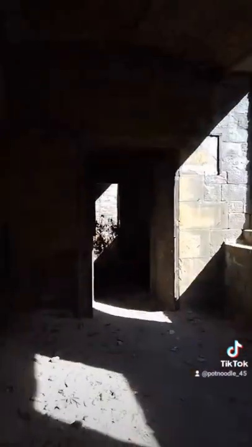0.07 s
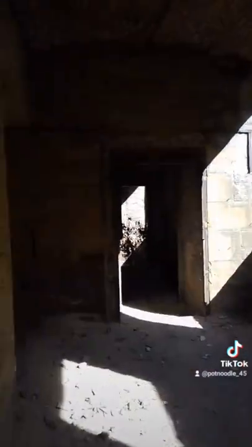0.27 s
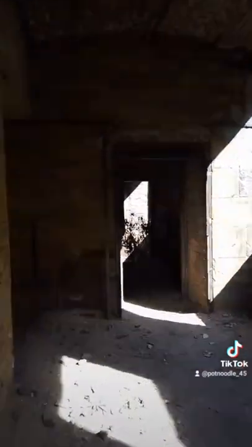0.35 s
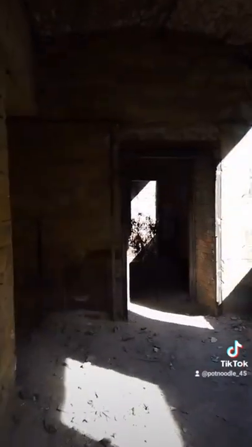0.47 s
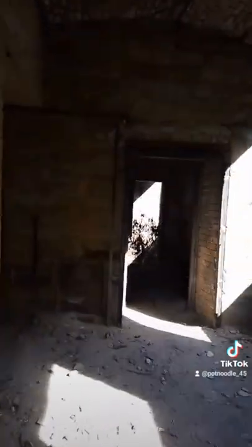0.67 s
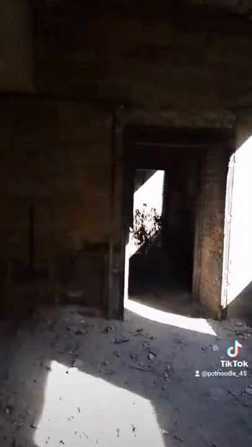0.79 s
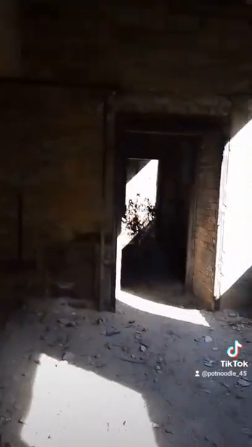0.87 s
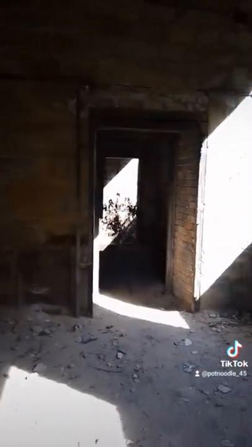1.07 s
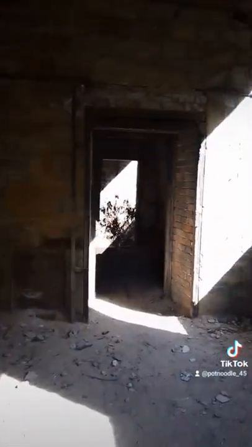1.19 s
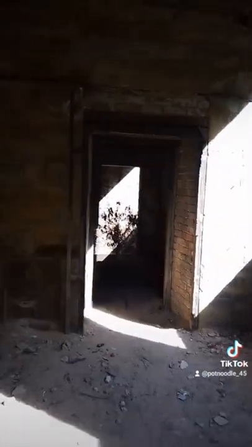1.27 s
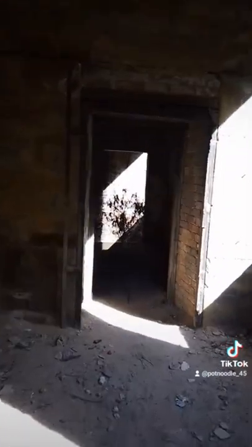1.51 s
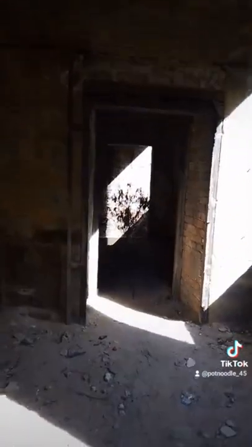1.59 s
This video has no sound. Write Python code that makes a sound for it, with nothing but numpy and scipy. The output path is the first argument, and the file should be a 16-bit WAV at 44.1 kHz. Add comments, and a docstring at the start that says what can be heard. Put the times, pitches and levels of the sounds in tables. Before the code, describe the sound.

A small hard shard clinks on a stone floor in an echoing, empty building. It first jingles under a shoe, and the heel thuds softly at 0.1 seconds. Kicked at about 0.2 seconds, it tumbles with a loud glassy ring, its bounces fading by 0.6. Quiet scuffs and gritty crunches follow from 0.7 to 1.6 seconds, with very faint birds outside over a low, steady room tone.

```python
"""Kicked shard in a stone hall

Someone walks over grit in a large, empty stone building. A small hard shard jingles under the shoe,
the heel lands, and the toe sends the shard tumbling with a high glassy ring until it knocks to rest
in quick, fading bounces. The next step scuffs and crunches, and the bare walls answer.
Birds chirp faintly outside, over a steady bed of air."""
import sys
import numpy as np
from scipy import signal
from scipy.fft import rfft, irfft, next_fast_len
from scipy.io import wavfile

SR = 44100
rng = np.random.default_rng(int(sys.argv[2]) if len(sys.argv) > 2 else 0)


def wav_out(sig):
    """Save sig, one row per channel (or a flat mono array), as 16-bit PCM at SR to the path in sys.argv[1]."""
    wavfile.write(sys.argv[1], SR, np.round(np.clip(np.atleast_2d(sig).T, -1, 1) * 32767).astype(np.int16))


N = 72765
T = np.arange(N) / SR

# The shard hits the floor. Each row: start in seconds, low ring in dB, high ring in dB,
# ring t60 in seconds, tick in dB, knock in dB.
CONTACTS = [(0.2250, -24, -22, 0.17, -17.5, -19.5), (0.2268, -5.5, -30, 0.62, -41, -39),
            (0.2405, -17.5, -28, 0.071, -14, -30), (0.2408, -1.5, -23, 0.12, -30, -26),
            (0.2448, -15.5, -15, 0.088, -3.5, -32), (0.2535, -15, -19, 0.39, -20, -17),
            (0.2974, -10, -19.5, 0.3, -11, -16.5), (0.3181, -1.5, -28, 0.085, -18, -13.5),
            (0.3280, -18, -27, 0.1, -34, -34), (0.3595, -19.5, -33, 0.064, -30, -65),
            (0.3986, -26.5, -32, 0.22, -19, -6.5), (0.4402, -24.5, -32, 0.087, -37, -17.5),
            (0.4536, -30, -36, .2, -23, -26), (0.4691, -35.5, -38.5, 0.21, -45, -22),
            (0.4897, -30, -44, 0.1, -63, -21), (0.5078, -28, -41.5, 0.14, -59, -25.5),
            (0.5238, -28, -50, 0.25, -52, -29), (0.5370, -34, -45, 0.24, -56, -30.5),
            (0.5487, -28.5, -67, 0.091, -60, -39), (0.5725, -34, -58, 0.099, -60, -60)]
# Its glassy modes. Each row: pitch in Hz, level in dB, share of the ring t60, 0 for low or 1 for high.
SHARD_MODES = [(9236, -1.5, 0.64, 0), (9220, -28, 0.51, 0), (9341, -23, 0.88, 0), (11638, -0.5, 1.0, 1)]
# The body of a knock. Each row: pitch in Hz before any drop or sag, level in dB.
KNOCK_PARTIALS = [(4367, 1), (5200, -6), (3400, -22)]
# The shard skids. Each row: start in seconds, length in seconds, opening level in dB.
SKIDS = [(0.238, 0.11, -24), (0.317, .075, -26.5)]
# Pinches under the sole. Each row: start in seconds, ring in dB, pitch in Hz, tick in dB.
JINGLES = [(0.01, -22, 9610, -18.5), (0.0401, -23.5, 9600, -27), (0.0500, -28.5, 9220, -23),
           (0.0595, -34, 10130, -28), (0.0916, -22, 9510, -21), (0.0990, -31, 9320, -39),
           (0.1225, -37, 9400, -33)]
# The pinched shard rings on. Each row: start in seconds, pitch in Hz, level in dB, t60 in seconds.
AFTER_RINGS = [(0.092, 11638, -40, .15)]
# Single grains crack. Each row: start in seconds, level in dB.
CRACKS = [(0.7078, -29.5), (0.7290, -24.5), (0.8048, -26), (0.8166, -21), (0.86, -31), (1.1640, -41),
          (1.35, -39), (1.3700, -29.5), (1.548, -37), (1.5630, -36)]
# The sole grinds on grit. Each row: start in seconds, length in seconds, peak level in dB.
CRUNCHES = [(0.005, 0.032, -43), (0.03, .05, -45.5), (0.087, 0.051, -36.5), (0.684, 0.078, -46),
            (0.729, 0.1, -47), (0.787, 0.22, -51), (1.11, 0.59, -56), (1.54, 0.088, -54)]
# The fader curve of the sliding sole. Each row: time in seconds, level in dB.
RUB_LEVEL = [(0.56, -65), (0.64, -56), (0.72, -51.5), (0.785, -49), (0.85, -50.5), (0.94, -55), (0.98, -87),
             (1.12, -67.5), (1.17, -51.5), (1.25, -64.5), (1.38, -56.5), (1.48, -65)]
# Heel and sole land. Each row: start in seconds, level in dB, t60 in seconds, low-pass edge in Hz.
THUDS = [(0.1005, -29.5, 0.026, 1700), (0.114, -37.5, 0.23, 1240), (0.141, -38, 0.37, 656),
         (1.162, -70, 0.045, 1900)]
# The stone floor's modes. Each row: pitch in Hz, level in dB, t60 in seconds.
SLAB_MODES = [(1061, -49, 0.69), (1534, -36, 0.05), (4160, -27.5, 0.1)]
# The floor booms. Each row: start in seconds, pitch in Hz, level in dB, t60 in seconds.
BOOMS = [(0.10, 63.4, -59.5, 0.84), (0.227, 178, -57, 0.26), (0.691, 169.7, -47, 0.37),
         (1.011, 264.6, -55.5, 1.05)]
# Bird calls. Each row: start in seconds, length in seconds, first and last pitch in Hz, level in dB.
CHIRPS = [(0.164, .05, 7130, 6780, -51), (0.929, .11, 5730, 5030, -58), (1.01, 0.052, 4870, 4130, -57.5),
          (1.061, 0.038, 2610, 2615, -63), (1.109, 0.055, 7900, 7190, -51.5),
          (1.364, 0.057, 5420, 5300, -59), (1.425, 0.043, 2655, 2580, -61)]

# The EQ curves that colour each layer. Each row: frequency in Hz, gain in dB.
TICK_EQ = [(30, -49), (150, -22.5), (600, -32), (1000, -8.5), (1900, -12), (3000, -13), (4200, 6),
           (5400, -5), (6600, 5.5), (7700, -9), (9500, 7.5), (11500, 4.5), (13000, -30), (16000, -30)]  # bright snap of shard on stone
SKID_EQ = [(1500, -34), (2500, -24), (4000, -9.5), (5000, -14), (6600, -14), (7800, -16), (8800, -13),
           (9230, 7.5), (9600, -3), (10700, -18.5), (11400, -27), (11640, 9), (12000, -17.5), (14000, -43)]  # chatter that peaks at the shard's modes
PINCH_EQ = [(100, -31), (3000, -47), (4200, -16), (5000, -3), (6400, -2), (8000, -6), (9600, -8),
            (11000, -22), (12200, -7), (14000, -20), (16000, -32)]  # thin ticks under the sole
CRACK_EQ = [(800, -11.5), (2500, -27), (4000, -18), (6500, -16), (8300, -5.5), (9300, 7), (10100, 8),
            (11000, -10), (13000, -20), (16000, -22)]  # brittle splitting grains
CRUSH_EQ = [(1200, -18), (2100, -3.5), (3200, -1.5), (5000, -13), (7000, 6.5), (9000, -15), (14000, -33)]  # crumbling mortar
GRIT_EQ = [(800, -21.5), (2500, -16), (4000, 4), (5400, 0.5), (6500, -4), (8300, -3), (9300, 6.5),
           (10100, 5.5), (11000, -1.5), (13000, -7.5), (16000, -29)]  # sandy crunch
RUB_EQ = [(500, -19), (900, -18), (1170, -15.5), (1300, -13), (1395, -1), (1520, -10), (1800, -12.5),
          (2300, -25.5), (2800, -21), (3300, -42), (5400, -21), (7000, -37)]  # hollow scuff
THUD_EQ = [(60, -29.5), (170, -6), (300, -7.5), (410, 3.5), (520, 2.5), (680, -9.5), (1100, -3), (1500, -2),
           (2200, -12)]  # dull weight of the shoe
KICK_EQ = [(40, -27), (200, -4), (600, -3), (1000, 9), (1600, -2.5), (2700, 6), (5500, 2), (8000, -13),
           (14000, -27)]  # midrange tap of the toe
HALL_EQ = [(100, -6), (180, 7.5), (500, -11.5), (1050, 1.5), (2200, -9.5), (4100, -9.5), (5400, -7),
           (7000, -12.5), (9300, 1), (12000, -15.5), (16000, -4.5)]  # bare stone walls
AIR_EQ = [(25, -37), (50, -10), (64, -5), (85, -5), (120, -2.5), (190, 0), (270, -4.5), (400, -6.5),
          (600, -8.5), (1040, -6), (1700, -15), (2200, -13.5), (2900, -20.5), (4000, -12.5), (5400, -20),
          (6600, -15.5), (8000, -14.5), (9900, -7.5), (11300, -14), (14800, -26.5), (16000, -37)]  # low murmur with a fine hiss on top

TICK_T60_S = 0.0053


def shard_ring():
    """The glassy ring: each contact chokes the shard's modes and strikes them anew."""
    choke_s = 0.0021
    out = np.zeros(N)
    ends = [row[0] for row in CONTACTS[1:]] + [N / SR]
    for (start, low_db, high_db, t60, _, _), end in zip(CONTACTS, ends):
        choke = np.exp(-np.clip((T - end) / choke_s, 0, 20))
        for hz, db, share, is_high in SHARD_MODES:
            strike_db = high_db if is_high else low_db
            out += from_db(db + strike_db) * choke * ring(start, hz, t60 * share)
    return out


def shard_blows():
    """Each hit on stone gives a sharp tick and a blunt knock that sags in pitch."""
    peak_s, sag_hz_per_s, hz_per_db = 0.00044, 74000, 11
    ticks, knocks = np.zeros(N), np.zeros(N)
    for start, _, _, _, tick_db, knock_db in CONTACTS:
        ticks += from_db(tick_db) * burst(start, TICK_T60_S)
        age = np.clip(T - start, 0, 20 * peak_s)
        swell = (age / peak_s * np.exp(1 - age / peak_s)) ** 2
        for hz, db in KNOCK_PARTIALS:
            onset_hz = hz + hz_per_db * knock_db  # softer blows are duller
            cycles = age * (onset_hz - .5 * sag_hz_per_s * age)
            knocks += from_db(knock_db + db) * swell * np.sin(2 * np.pi * cycles)
    return colour(ticks, TICK_EQ) + butter(knocks, 3, [2580, 5580], "band")


def shard_skids():
    """The shard's edge chatters over the floor in short, fading slides."""
    fade_db = 14
    level = np.zeros(N)
    for start, length, db in SKIDS:
        along = np.clip((T - start) / length, 0, 1)
        level += from_db(db - fade_db * along) * (T > start) * (T < start + length)
    return grains(level, SKID_EQ)


def jingles():
    """Pinched under the sole, the shard ticks and rings briefly."""
    rings = sum(from_db(db) * ring(start, hz, t60=0.037) for start, db, hz, _ in JINGLES)
    rings += sum(from_db(db) * ring(start, hz, t60) for start, hz, db, t60 in AFTER_RINGS)
    ticks = sum(from_db(db) * burst(start, TICK_T60_S) for start, _, _, db in JINGLES)
    return rings + colour(ticks, PINCH_EQ)


def grit():
    """Under the walker's weight grains crack, a lump of mortar crumbles and grit crunches."""
    attack_share = 0.19
    cracks = sum(from_db(db) * burst(start, t60=0.0094) for start, db in CRACKS)
    mortar = from_db(-40.5) * decay(start=0.049, t60=0.11) * noise(CRUSH_EQ)
    pressure = np.zeros(N)
    for start, length, db in CRUNCHES:
        corners = [start, start + attack_share * length, start + length]
        pressure += from_db(db) * np.interp(T, corners, [0, 1, 0])
    return colour(cracks, CRACK_EQ) + mortar + grains(pressure, GRIT_EQ)


def sole_rub():
    """The sliding sole rubs hollowly; a narrow squeak comes forward as it presses harder."""
    squeak_hz, half_width_hz = 1383, 60
    band_hz = [squeak_hz - half_width_hz, squeak_hz + half_width_hz]
    squeak = from_db(-7.5) * rms_one(butter(rng.standard_normal(N), 2, band_hz, "band"))
    effort = from_db(np.interp(T, *np.transpose(RUB_LEVEL)))
    return effort * (noise(RUB_EQ) + squeak * np.sqrt(effort / effort.max()))


def shoe_thuds():
    """Dull thuds as the foot rolls down from heel to sole."""
    out = np.zeros(N)
    for start, db, t60, edge_hz in THUDS:
        dull = butter(noise(THUD_EQ), 4, edge_hz)
        out += from_db(db) * decay(start, t60) * rms_one(dull)
    return out


def toe_kick():
    """One tight tap as the toe meets the shard."""
    return from_db(-21) * colour(burst(start=0.2248, t60=.006), KICK_EQ)


def slab_ring():
    """The stone floor rings faintly under each knock."""
    blows = np.zeros(N)
    for start, *_, knock_db in CONTACTS:
        blows[int(start * SR)] = from_db(knock_db)
    response = sum(from_db(db) * ring(0, hz, t60) for hz, db, t60 in SLAB_MODES)
    return signal.fftconvolve(blows, response)[:N]


def floor_booms():
    """The walker's weight draws soft, low booms from the floor."""
    return sum(from_db(db) * ring(start, hz, t60) * attack(start, rise_s=0.018)
               for start, hz, db, t60 in BOOMS)


def hall(send):
    """Quick scatter from the floor, then a long diffuse tail whose treble dies first."""
    split_hz, tail_db, early_db = 6500, -7.5, -4
    white = rng.standard_normal((3, N))
    body = butter(white[0], 4, split_hz) * decay(0, t60=0.89)
    treble = butter(white[1], 4, split_hz, "high") * decay(0, t60=0.3)
    tail = (body + treble) * attack(0, rise_s=0.016)
    early = white[2] * decay(start=.003, t60=0.15)
    response = (from_db(tail_db) * rms_one(tail) + from_db(early_db) * rms_one(early)) / np.sqrt(N)
    return signal.fftconvolve(send, colour(response, HALL_EQ))[:N]


def birds():
    """Trilled, mostly falling chirps from outside, washed out by the walls."""
    trill_hz, trill_depth = 65.7, 0.045
    trill = 1 + trill_depth * np.sin(2 * np.pi * trill_hz * T)
    calls = np.zeros(N)
    for start, length, first_hz, last_hz, db in CHIRPS:
        along = np.clip((T - start) / length, 0, 1)
        hz = (first_hz + (last_hz - first_hz) * along) * trill
        swell = np.sqrt(2 * np.abs(np.sin(np.pi * along)))
        calls += from_db(db) * swell * np.sin(2 * np.pi * np.cumsum(hz) / SR)
    wash = rms_one(rng.standard_normal(N) * decay(0, t60=0.65)) / np.sqrt(N)
    return signal.fftconvolve(calls, wash)[:N]


def air():
    """The quiet, steady room tone of the empty building."""
    return from_db(-55) * noise(AIR_EQ)


def ring(start, hz, t60):
    """One struck mode, a little detuned at random."""
    age = np.maximum(T - start, 0)
    detuned_hz = hz + 5.15 * rng.normal()
    return decay(start, t60) * attack(start, rise_s=0.00051) * np.sin(2 * np.pi * detuned_hz * age)


def burst(start, t60):
    """A hard contact: one sharp click and a brief rough tail."""
    tail_share = 0.81  # of the energy
    fade = decay(start, t60)
    out = np.sqrt(tail_share) * fade * rng.choice([-1, 1], N)
    out[int(start * SR)] += np.sqrt((1 - tail_share) * np.sum(fade ** 2))
    return out


def grains(level, eq):
    """Dense tiny clicks of uneven size, riding a level curve through a gain-matched EQ."""
    grains_per_s, spread_db = 1200, 2
    sizes = from_db(spread_db * np.minimum(rng.exponential(1, N), 4))
    signs = rng.choice([-1, 1], N)
    clicks = rms_one(sizes * signs * (rng.random(N) < grains_per_s / SR))
    eq_gain = np.std(colour(rng.standard_normal(N), eq))
    return colour(level * clicks, eq) / eq_gain


def noise(eq):
    """Coloured noise at rms 1."""
    return rms_one(colour(rng.standard_normal(N), eq))


def attack(start, rise_s):
    """A fade-in with time constant rise_s."""
    return 1 - np.exp(-np.maximum(T - start, 0) / rise_s)


def decay(start, t60):
    """An envelope that opens at start and falls 60 dB every t60 seconds."""
    return (T >= start) * from_db(-60 * np.clip((T - start) / t60, 0, 4))


def colour(x, eq):
    """Minimum-phase EQ: nothing rings ahead of a transient."""
    size = 2 * next_fast_len(N)
    hz, db = np.transpose(eq)
    bin_hz = np.arange(size // 2 + 1) * SR / size
    gain = from_db(np.interp(np.log(bin_hz + 1), np.log(hz), db))
    cepstrum = irfft(np.log(gain))
    cepstrum[1:size // 2] *= 2  # fold onto positive time to make the filter causal
    cepstrum[size // 2 + 1:] = 0
    return irfft(rfft(x, size) * np.exp(rfft(cepstrum)))[:N]


def butter(x, order, hz, kind="low"):
    """A smooth low-, high- or band-pass."""
    return signal.sosfilt(signal.butter(order, hz, kind, fs=SR, output="sos"), x)


def from_db(db):
    """Decibels to gain."""
    return 10 ** (np.asarray(db) / 20)


def rms_one(x):
    """Scale to rms 1."""
    return x / np.sqrt(np.mean(x ** 2) + 1e-20)


def scene():
    """The mono mix: shard and footsteps feed the hall, over floor resonances, birds and air."""
    rings, skids, blows = shard_ring(), shard_skids(), shard_blows()
    steps = jingles() + grit() + sole_rub() + shoe_thuds() + toe_kick()
    direct = rings + skids + blows + steps
    reverb = hall(from_db(-9.5) * rings + from_db(-3) * skids + blows + steps)
    return (direct + reverb + slab_ring() + floor_booms() + birds() + air())[None]


def record(dry):
    """A hard clip on the highest peaks, then a steep cut of the very top."""
    ceiling, cutoff_hz = .82, 15900
    high_cut = signal.ellip(10, .1, 80, cutoff_hz, fs=SR, output="sos")
    return signal.sosfilt(high_cut, np.clip(dry, -ceiling, ceiling))


dry = scene()
out = record(dry)
wav_out(out)
```